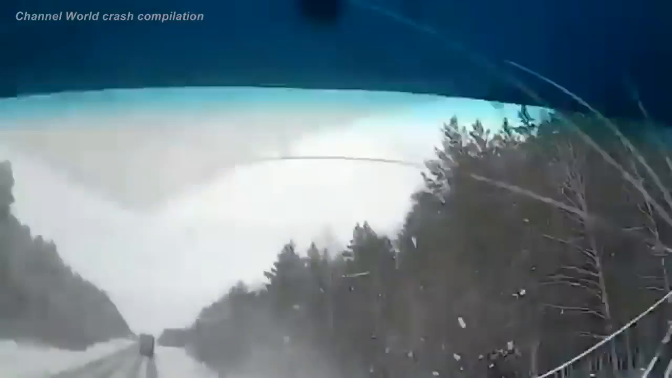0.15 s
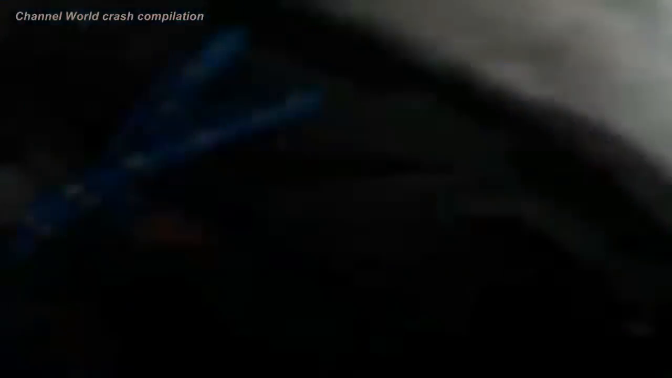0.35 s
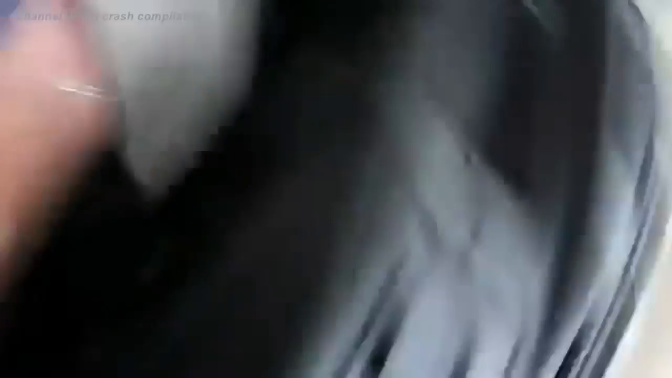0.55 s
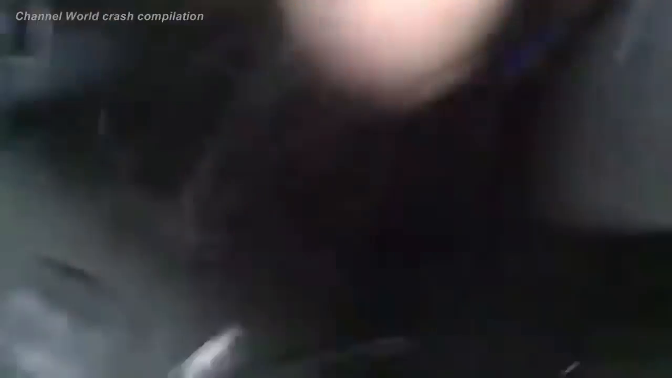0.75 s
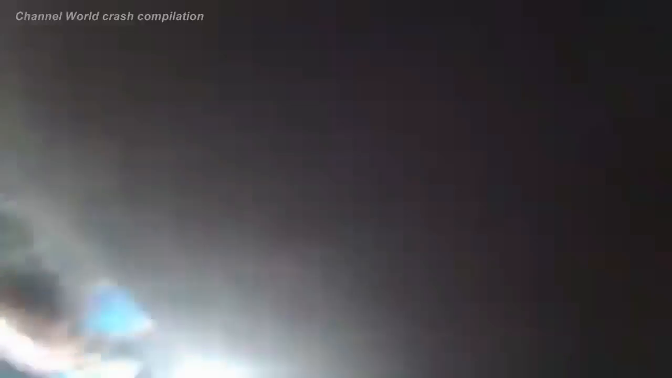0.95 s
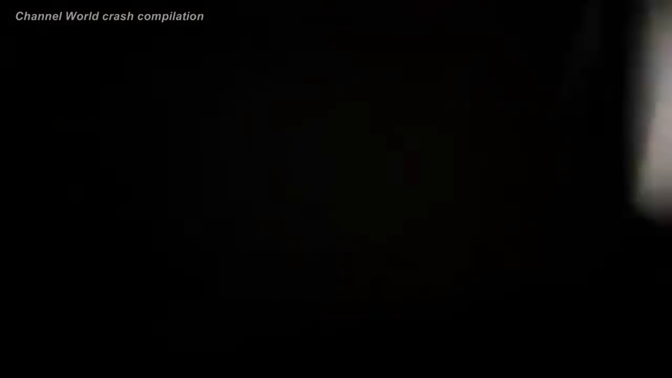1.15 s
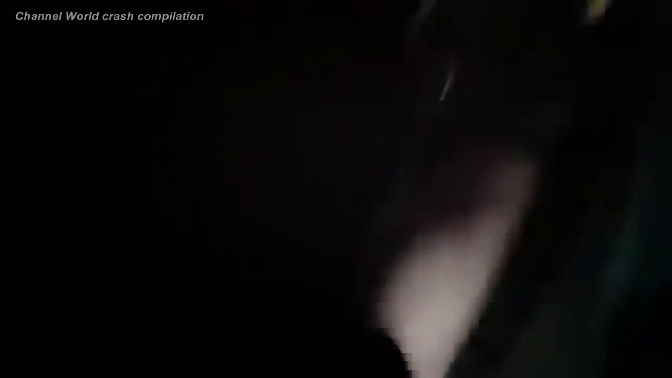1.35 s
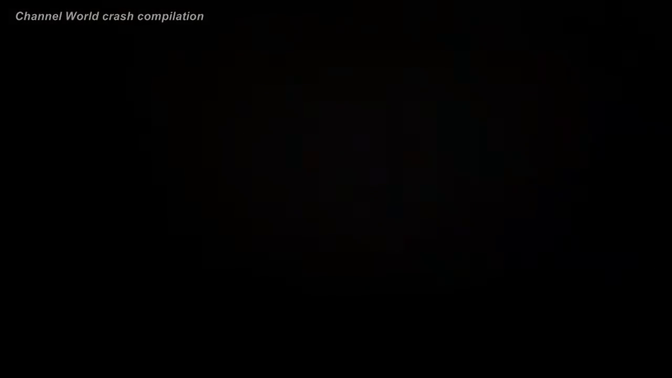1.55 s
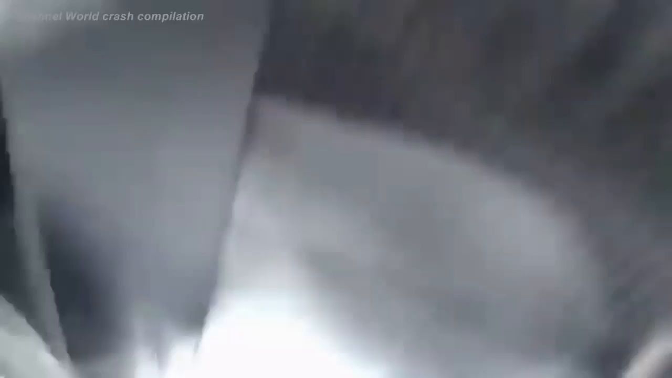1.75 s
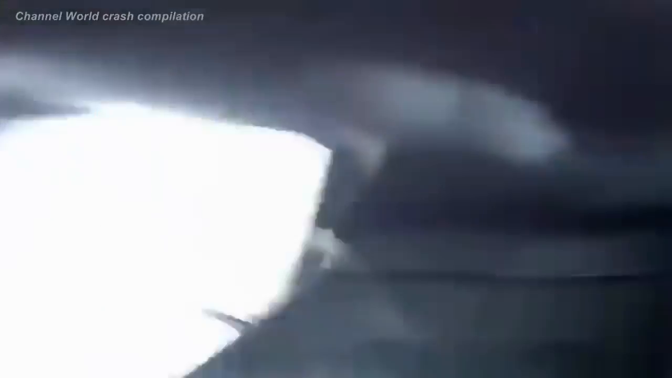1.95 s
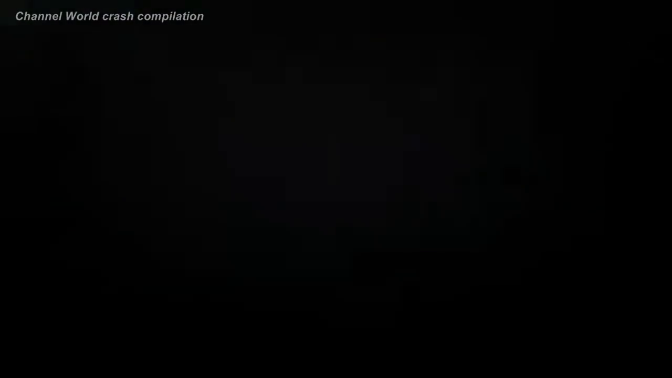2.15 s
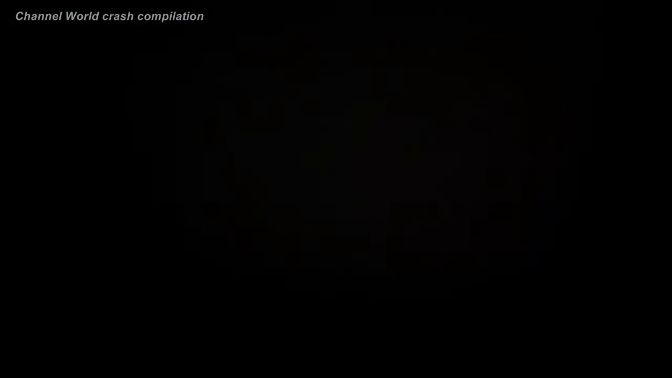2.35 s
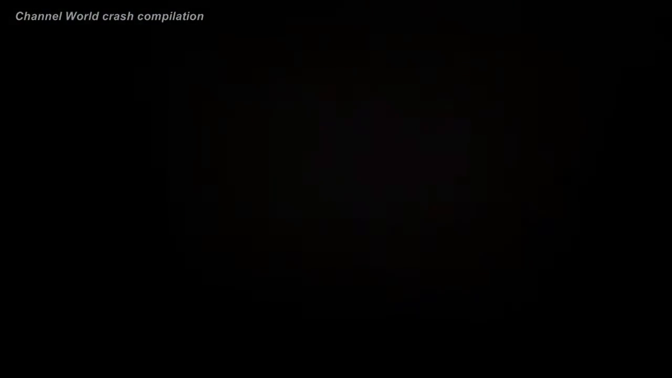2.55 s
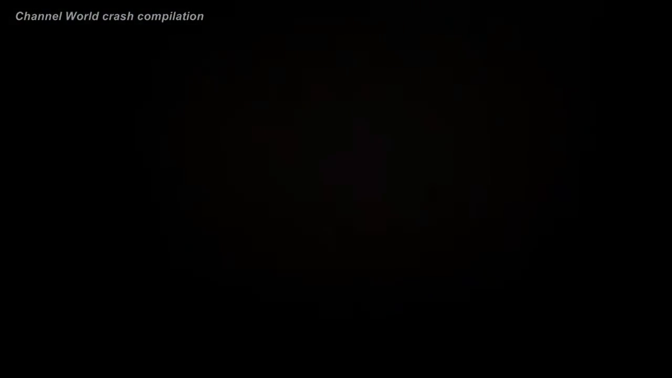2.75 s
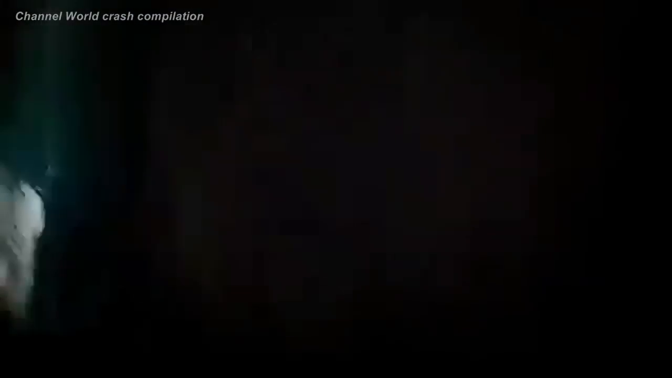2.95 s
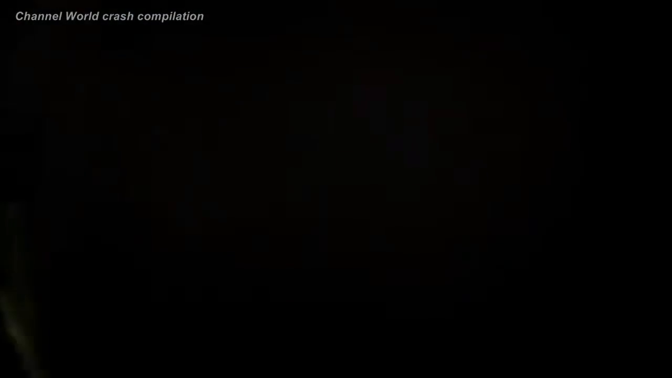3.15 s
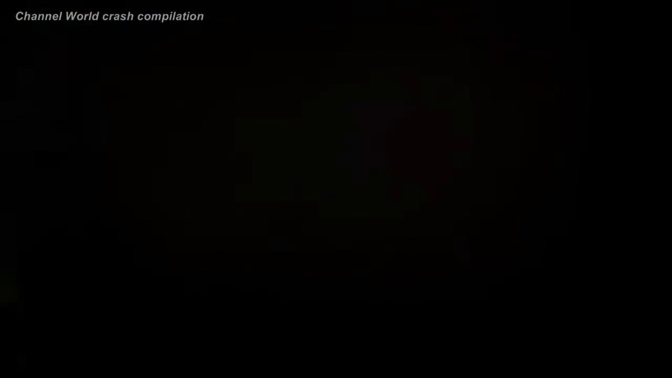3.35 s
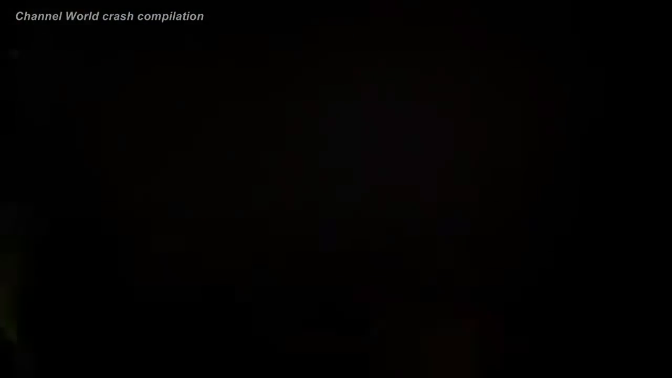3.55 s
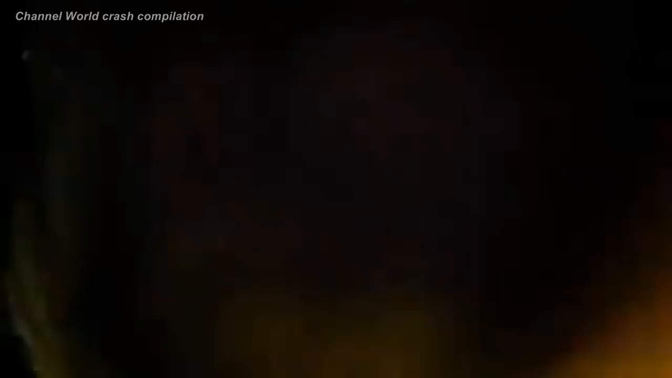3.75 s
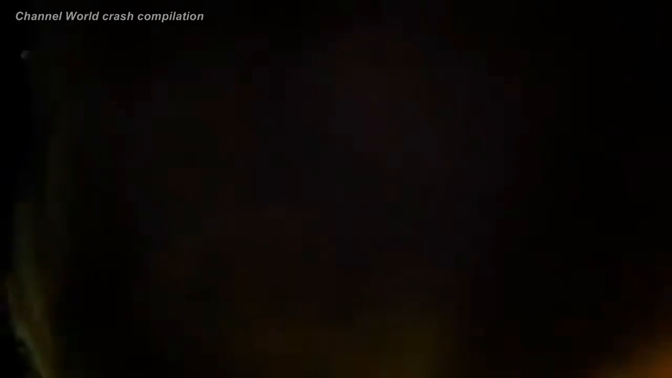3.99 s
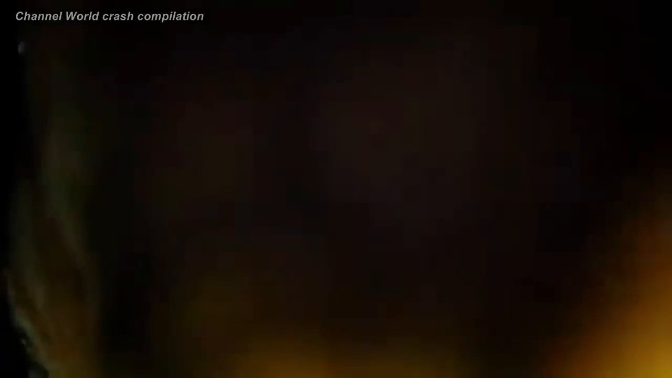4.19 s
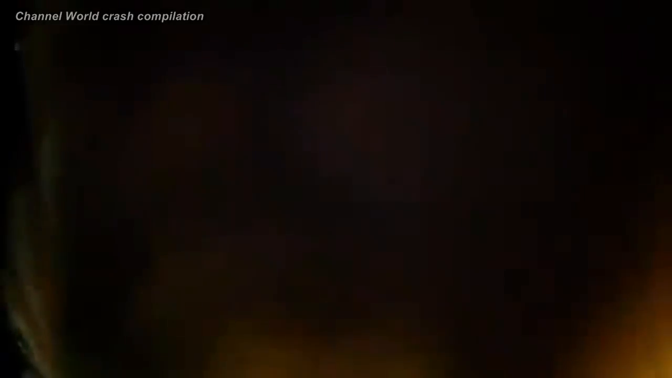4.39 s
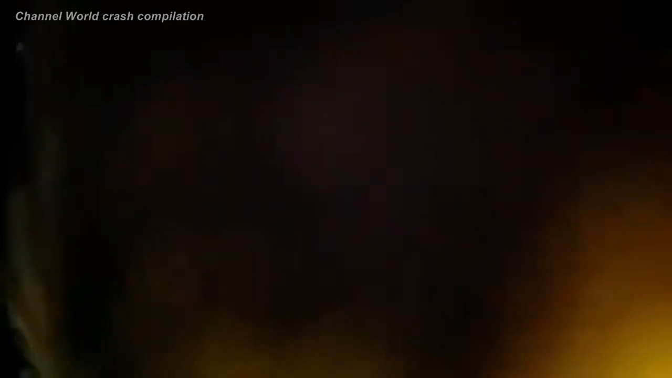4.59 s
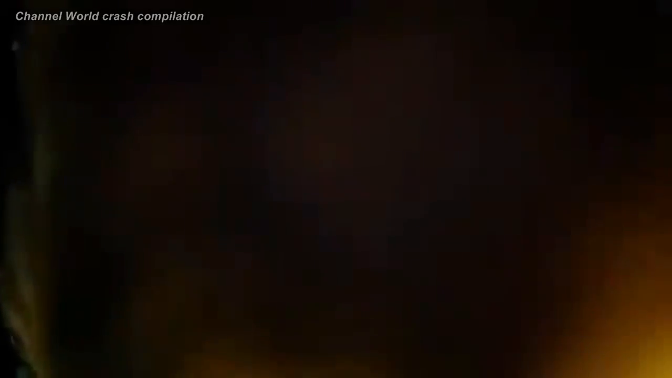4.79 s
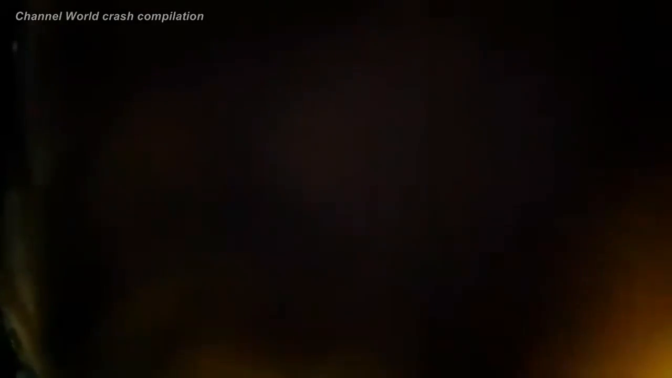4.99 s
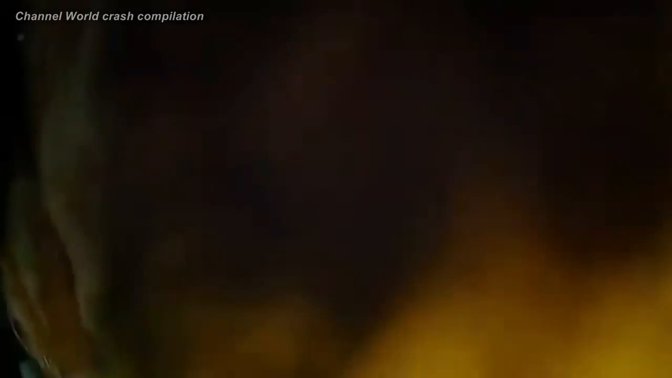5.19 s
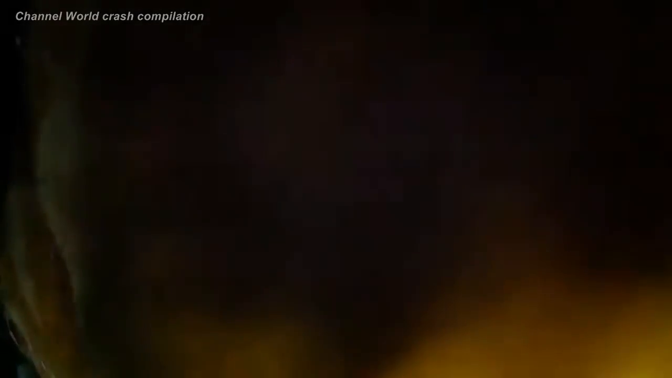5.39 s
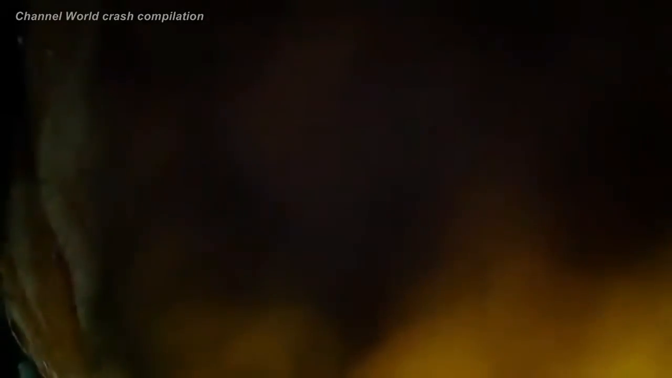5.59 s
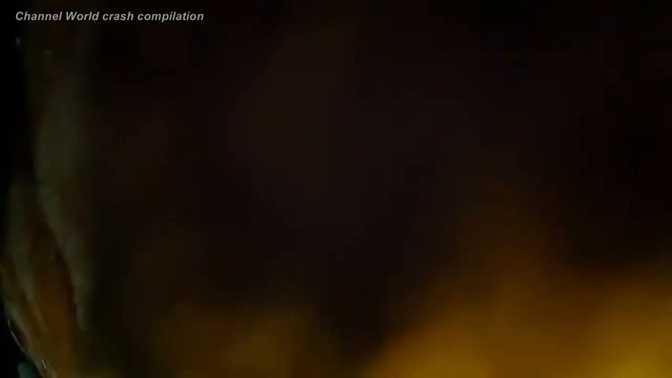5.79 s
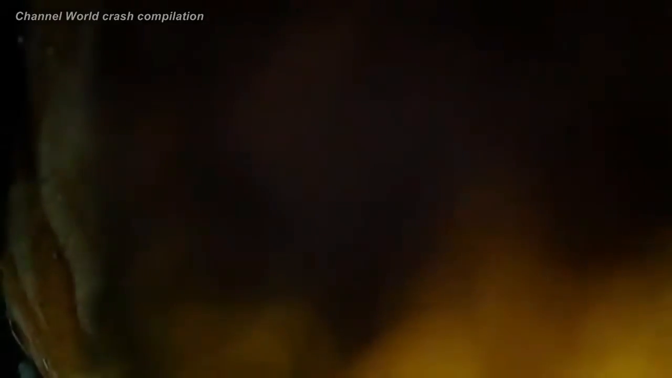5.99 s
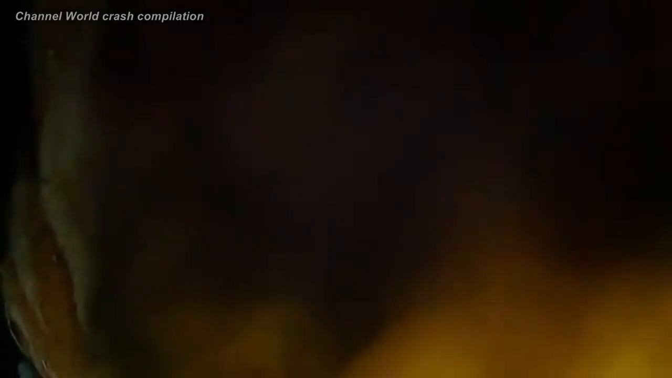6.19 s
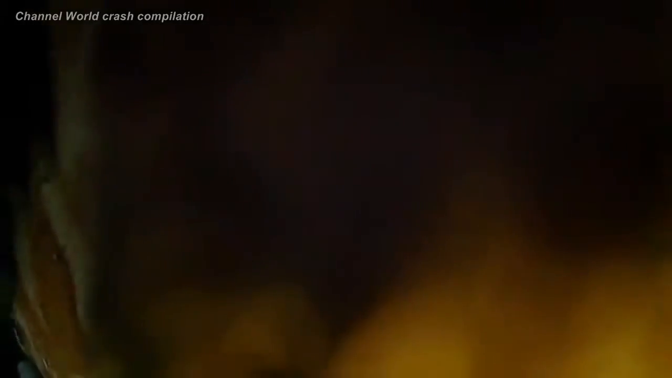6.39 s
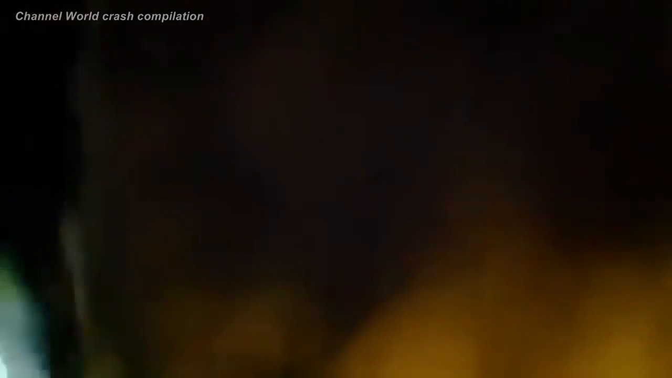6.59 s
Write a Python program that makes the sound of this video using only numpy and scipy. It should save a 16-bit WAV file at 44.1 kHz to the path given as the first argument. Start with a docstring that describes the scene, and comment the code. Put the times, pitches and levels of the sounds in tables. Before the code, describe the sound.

Overloaded crunching of crumpling metal, sharp knocks and scraping fragments in a vehicle cab, surging twice, then fading to faint rattles over quiet hiss.

```python
"""Lorry crash and rollover

Heard in the cab: sheet metal crumples, the body booms and hard things strike near the microphone;
then loose parts slide, knock and clink while everything settles.
Crumpling and booming are filtered noise with wandering levels, fragments and glass are damped sines,
and contacts are noise bursts that excite damped modes. The microphone stage overloads on the loudest."""
import sys
import numpy as np
from scipy import signal
from scipy.fft import rfft, irfft, next_fast_len
from scipy.io import wavfile
from scipy.ndimage import uniform_filter1d, map_coordinates

SR = 44100
rng = np.random.default_rng(int(sys.argv[2]) if len(sys.argv) > 2 else 0)


def to_wav(s):
    """Save 16-bit WAV."""
    ch = np.atleast_2d(s).T  # columns
    pcm = np.round(np.clip(ch, -1, 1) * 32767)  # PCM
    wavfile.write(sys.argv[1], SR, pcm.astype(np.int16))


N = 292812

# Slow course of the crumpling and sliding debris: (time [s], level [dB])
WRECK_COURSE = [(0.0, 0), (0.21, 1.5), (0.38, -8), (0.7, -21), (0.8, -19), (0.92, -29), (1.12, -36),
                (1.24, -30), (1.49, -33), (1.6, -8), (1.93, -13), (2.16, -6), (2.36, -19), (2.5, -12),
                (2.73, -33), (2.8, -25), (3.16, -38), (3.5, -37), (3.92, -54), (4.17, -51), (4.63, -44),
                (5.2, -50), (5.82, -64), (6.3, -63), (6.63, -55.5)]
# Noise spectrum of crunching and scraping: (frequency [Hz], relative power density [dB])
GRIT_SPECTRUM = [(300, -29.5), (700, -4.5), (1200, -1), (2000, -4), (3000, -3.5), (4000, -10), (6000, -23),
                 (10500, -21.5), (13000, -39)]
# Sudden hits near the microphone: (time [s], strength [dB], ring frequency [Hz], contact duration [s])
HITS = [(0.426, -6, 1850, 0.022), (0.488, 3.5, 1950, 0.025), (0.552, 3, 2834, 0.026),
        (0.628, -16, 2200, 0.003), (0.733, 0, 1960, 0.0063), (0.746, -1, 1394, 0.0017),
        (0.788, -4, 2500, 0.005), (0.931, -1.5, 2290, 0.0035), (0.972, 3.5, 1960, 0.014),
        (1.008, -5.5, 1900, 0.0046), (1.054, -13.5, 1000, 0.0024), (1.182, -23, 3397, 0.004),
        (1.255, 3, 2930, 0.0095), (1.283, 1, 3330, 0.018), (1.307, -1, 1200, 0.005),
        (1.331, -1, 1069, 0.008), (1.345, -1, 1097, 0.0024), (1.356, 2.5, 1106, 0.0039),
        (1.379, -6, 1130, 0.0023), (1.418, -9, 1680, 0.0027), (1.468, -3.5, 1810, 0.002),
        (1.477, -6, 1930, 0.0023), (1.649, 1.5, 2178, 0.026), (1.727, -4, 2062, 0.0039),
        (2.066, -2, 2100, 0.006), (2.182, 0.5, 1660, 0.027), (2.297, -5.5, 1093, 0.007),
        (2.312, -5.5, 2240, 0.003), (2.371, -9, 2987, 0.003), (2.504, 0.5, 2230, 0.03),
        (2.55, -1.5, 2340, 0.0057), (2.588, -15, 2480, 0.0064), (2.627, 0.5, 2370, 0.0047),
        (2.652, -8.5, 2996, 0.0022), (2.66, -9.5, 2118, 0.017), (2.688, -6, 3125, 0.002),
        (2.701, -14, 2146, 0.001), (2.772, -15, 1070, 0.003), (2.809, -13, 2250, 0.003),
        (2.818, -0.5, 2250, 0.012), (2.841, -6.5, 2370, 0.0036), (2.853, -11.5, 1582, 0.001),
        (2.864, -12.5, 2470, 0.002), (2.899, 3, 1990, 0.0058), (2.918, -9.5, 2390, 0.001),
        (2.955, -6, 1177, 0.003), (3.04, -12.5, 2180, 0.003), (3.143, -32, 3380, 0.0023),
        (3.286, -22.5, 3240, 0.002), (3.395, -27.5, 900, 0.007), (3.642, -27, 3320, 0.003),
        (3.723, -29, 2280, 0.009), (3.747, -34.5, 2610, 0.0055), (4.183, -29.5, 3000, 0.002),
        (4.211, -33, 2070, 0.008), (4.285, -33, 3560, 0.014), (4.49, -27.5, 3000, 0.003),
        (4.531, -24, 1550, 0.002), (4.57, -36, 3000, 0.002), (4.638, -20.5, 1220, 0.0017),
        (4.68, -36, 2270, 0.008), (4.758, -30.5, 2680, 0.014), (4.775, -37.5, 2600, 0.045),
        (4.877, -19.5, 1070, 0.0035), (4.95, -29, 1290, 0.002), (4.976, -36.5, 1090, 0.002),
        (5.046, -41, 810, 0.0055), (5.14, -33.5, 2300, 0.0066), (5.15, -21.5, 2400, 0.0022),
        (5.206, -26.5, 1440, 0.015), (5.222, -38.5, 2520, 0.022), (5.252, -35, 950, 0.013),
        (5.688, -33, 1620, 0.001), (6.007, -46.5, 812, 0.008), (6.095, -37.5, 3300, 0.002),
        (6.147, -49, 2400, 0.008), (6.512, -45.5, 817, 0.01)]
# Scrapes and crunches that swell before they bite:
# (time [s], strength [dB], ring frequency [Hz], swell duration [s], contact duration [s])
SCRAPES = [(0.38, 2, 2495, 0.02, 0.013), (0.634, -13, 1527, 0.008, 0.004), (0.795, -12, 2616, 0.008, 0.027),
           (0.955, -19, 2200, 0.014, 0.003), (1.14, -18.5, 1985, 0.0084, 0.0074),
           (1.228, -22, 2600, 0.01, 0.015), (1.316, -12, 2400, 0.005, 0.004),
           (1.39, -1, 3070, 0.011, 0.0097), (1.538, 0, 480, 0.025, 0.025), (1.596, 5.5, 2890, 0.01, 0.028),
           (1.731, -3.5, 1274, 0.051, 0.0038), (1.842, -6.5, 1572, 0.027, 0.0088),
           (1.9, -9, 1500, 0.03, 0.03), (1.95, -6, 1082, 0.036, 0.041), (2.048, -2, 2028, 0.014, 0.0085),
           (2.071, -2, 853, 0.049, 0.026), (2.158, 2.5, 2303, 0.005, 0.014), (2.212, 1, 2285, 0.014, 0.028),
           (2.324, -8.5, 1128, 0.0042, 0.018), (2.38, -9, 1160, 0.0089, 0.0079),
           (2.431, -2, 2280, 0.046, 0.017), (2.733, -23.5, 1607, 0.013, 0.01),
           (2.929, -8, 2337, 0.01, 0.002), (3.085, -30, 3000, 0.01, 0.03),
           (3.179, -27.5, 3100, 0.028, 0.005), (3.352, -32, 1010, 0.022, 0.0043),
           (3.443, -36, 840, 0.024, 0.0051), (3.48, -33, 3100, 0.029, 0.019),
           (3.681, -33, 2260, 0.013, 0.024), (3.966, -49, 810, 0.034, 0.023),
           (4.228, -28.5, 3400, 0.011, 0.012), (4.308, -28.5, 1430, 0.011, 0.006),
           (4.37, -39.5, 990, 0.013, 0.002), (4.717, -31.5, 810, 0.031, 0.003),
           (4.999, -37, 830, 0.0057, 0.009), (5.02, -33, 1000, 0.006, 0.0043),
           (5.339, -46, 2290, 0.011, 0.037), (5.621, -49, 816, 0.039, 0.006),
           (5.705, -47, 2400, 0.004, 0.012), (6.031, -48.5, 814, 0.016, 0.008),
           (6.41, -53, 2600, 0.02, 0.02), (6.452, -47, 2910, 0.017, 0.025),
           (6.575, -49.5, 810, 0.018, 0.007)]
HIT_RISE_S = .001
# All contacts in order of time, with the columns of SCRAPES
CONTACTS = sorted([(s, db, hz, HIT_RISE_S, contact) for s, db, hz, contact in HITS] + SCRAPES)


def amp(db):
    """Amplitude ratio of a level in decibels."""
    return 10 ** (np.asarray(db) / 20)


def unit(x):
    """Normalization to a root-mean-square value of one."""
    return x / np.sqrt(np.mean(x ** 2) + 1e-20)


def curves(rows):
    """Linear interpolation: one value per sample for each column after the time."""
    s, *columns = np.transpose(rows)
    return [np.interp(np.arange(N) / SR, s, column) for column in columns]


def wobble(rate):
    """Band-limited fluctuation: a spline through random knots, rate of them a second."""
    knots = rng.standard_normal(int(N * rate / SR) + 4)
    return map_coordinates(knots, [np.arange(N) * rate / SR])


def coloured(x, points):
    """Minimum-phase filtering by (Hz, dB) points, with power gain 1 for white noise."""
    f, db = np.transpose(points)
    hz = np.fft.rfftfreq(4096, 1 / SR)
    gain = unit(amp(np.interp(np.log(hz + 1), np.log(f + 1), db)))
    # folding the cepstrum onto positive times makes the filter causal
    cepstrum = irfft(np.log(gain + 1e-6))
    cepstrum[1:2048] *= 2
    cepstrum[2049:] = 0
    response = irfft(np.exp(rfft(cepstrum)))
    return signal.fftconvolve(x, response)[:len(x)]


def patchy(depth_db, bins, frames):
    """Random modulation in time and frequency: noise whose loudness varies in patches."""
    z = signal.stft(rng.standard_normal(N), nperseg=256)[2]
    field = uniform_filter1d(rng.standard_normal(z.shape), size=bins, axis=0)
    field = uniform_filter1d(field, size=frames, axis=1)
    return unit(signal.istft(z * amp(depth_db * unit(field)), nperseg=256)[1][:N])


def dying(rows, rise_s):
    """Exponential decay: summed power of events (time [s], level [dB], t60 [s]) after a short rise."""
    power = np.zeros(N + SR)
    t = np.arange(SR) / SR
    for s, db, t60 in rows:
        envelope = amp(db - 60 * t / t60) * np.minimum(1, t / rise_s)
        power[round(s * SR):][:SR] += envelope ** 2
    return power[:N]


def hiss():
    """Stationary random noise: the quiet cab and the electronics beneath every other sound."""
    # Background spectrum: (frequency [Hz], relative power density [dB])
    hiss_spectrum = [(25, -27), (170, -1.5), (260, -8), (1270, -15), (4330, -33), (10500, -30.5),
                     (12500, -59.5)]
    return amp(-59) * coloured(rng.standard_normal(N), hiss_spectrum)


def boom():
    """Low-frequency structural resonance: shell and loose panel boom, and the chassis rumbles."""
    # Spectra of shell, loose panel and chassis: (frequency [Hz], relative power density [dB])
    shell_spectrum = [(60, -29), (150, -7), (320, -0.5), (500, -1.5), (800, -8), (1500, -26), (3000, -51.5)]
    panel_spectrum = [(60, -30), (120, -6), (180, 0), (240, -3), (400, -25), (1200, -70), (4000, -120)]
    chassis_spectrum = [(15, -28.5), (40, -11), (90, 0.5), (140, -6), (300, -40.5)]
    # Heavy knocks on the shell: (time [s], level [dB], decay time t60 [s])
    thuds = [(0.0, -13, 1.5), (0.4, -17, 1.2), (0.72, -19, .4), (0.97, -22, .6), (1.25, -23, .7),
             (1.495, -7, .6), (1.54, -5, .5), (1.585, -7, .8), (1.66, -10, 1), (1.74, -10, 2.2),
             (2.64, -26, .6), (2.91, -25, 1), (3.04, -24, .6), (3.38, -27, .3), (3.435, -25, .6),
             (3.645, -33, .3), (3.76, -39, .5), (3.82, -29.5, .25), (3.96, -36, .7), (4.07, -37, .35),
             (4.26, -38, 2), (4.575, -32, .6), (4.72, -37, .8), (5.0, -36, .8), (5.45, -50, 1),
             (6.06, -56, .8), (6.25, -56, 2), (6.4, -57, 3)]
    # Deep rumble of the chassis: (time [s], level [dB])
    chassis_course = [(0.0, -19.5), (0.09, -27), (1.2, -46), (1.64, -23), (2.75, -48), (2.9, -34),
                      (3.23, -48), (4.3, -58), (5.05, -53), (5.97, -61), (6.4, -51), (6.64, -51)]

    shell = coloured(patchy(depth_db=2.5, bins=1, frames=5) * amp(2.2 * wobble(35)), shell_spectrum)
    panel = coloured(rng.standard_normal(N) * amp(3 * wobble(14)), panel_spectrum)
    chassis = coloured(rng.standard_normal(N) * amp(2.2 * wobble(6.9)), chassis_spectrum)

    # the shell drones along with the debris, and the powers of the thuds add to it
    drone_db = .72 * curves(WRECK_COURSE)[0] - 14.5
    shell_db = 10 * np.log10(amp(drone_db) ** 2 + dying(thuds, rise_s=.015))
    # a slope below 1 lets the panel stand out more when the shell is quiet
    panel_db = .78 * shell_db - 14.5
    chassis_db = curves(chassis_course)[0]
    return amp(shell_db) * unit(shell) + amp(panel_db) * unit(panel) + amp(chassis_db) * unit(chassis)


def clinks():
    """Free vibration of a single mode: each small piece of glass rings at one decaying tone."""
    # Glass pieces: (time [s], frequency [Hz], level [dB], decay time t60 [s])
    glass = [(5.345, 2290, -43, 0.11), (5.398, 4107, -42.5, 0.2), (5.4, 2320, -50, .07),
             (5.47, 3640, -51.5, .1)]
    out, t = np.zeros(N + SR), np.arange(SR // 3) / SR
    for s, hz, db, t60 in glass:
        envelope = amp(db - 60 * t / t60) * np.minimum(1, t / 0.0039)
        out[round(s * SR):][:len(t)] += envelope * np.sin(2 * np.pi * hz * t)
    return out[:N]


def squeal():
    """Irregular frictional vibration: a dragged metal edge sings with unsteady pitch and level."""
    # Dragging metal: (time [s], mean frequency [Hz], mean level [dB])
    drag = [(2.43, 2300, -40), (2.455, 2350, -8), (2.49, 2300, -1), (2.52, 2220, -3.5), (2.56, 2320, -15.5),
            (2.575, 2300, -40)]
    hz, db = curves(drag)
    db = np.where(db > -40, db, -120)  # silent outside the drag
    rough_hz = hz + 130 * wobble(250)
    return amp(db + 4 * wobble(180)) * np.sin(2 * np.pi * np.cumsum(rough_hz) / SR)


def grains(count, centre_hz, cycles, spread_db):
    """Superposed free vibrations: small fragments, each a short damped ring at its own pitch."""
    when, pitch = rng.random(count), rng.standard_normal(count)
    size = np.minimum(rng.exponential(size=count), 3)
    hz = np.clip(centre_hz * np.exp(.4 * pitch), 600, 4200)[:, None]
    step = np.arange(SR // 150)
    decay = np.exp(-step / SR * hz / cycles)  # falls to 1/e in this many cycles
    rings = amp(spread_db * size)[:, None] * decay * np.sin(2 * np.pi * hz * step / SR)
    at = (when * N).astype(int)[:, None] + step
    return unit(np.bincount(at.ravel(), rings.ravel(), minlength=N)[:N])


def debris_db():
    """Addition of incoherent powers: the course of the wreck plus what each contact shakes loose."""
    shake_db, shake_t60 = -21, .45  # dB relative to the contact's strength, s
    loosened = [(s + rise + contact, db + shake_db, shake_t60) for s, db, hz, rise, contact in CONTACTS]
    shaken = dying(loosened, rise_s=.015)
    return 10 * np.log10(amp(curves(WRECK_COURSE)[0]) ** 2 + shaken)


def crunch():
    """Dense random micro-impacts: crumpling metal and grit as a patchy rush full of ringing fragments."""
    rush = coloured(patchy(depth_db=2.0, bins=4, frames=4) * amp(1.8 * wobble(60)), GRIT_SPECTRUM)
    bits = grains(count=3500, centre_hz=2300, cycles=2.5, spread_db=4)
    return amp(debris_db()) * unit(unit(rush) + amp(-3) * bits)


def contact_burst(t, rise, contact, t60, tail_db, tail_t60):
    """Contact excitation: noise swells, chatters while the pieces touch, then dies; the cab answers."""
    after = np.maximum(t - rise - contact, 0)
    swell = amp(-15 * np.maximum(1 - t / rise, 0))
    decay = amp(-60 * after / t60) + amp(tail_db - 60 * after / tail_t60)  # own decay + cab's answer
    knots = t[::70]
    chatter = amp(3.8 * np.interp(t, knots, rng.standard_normal(len(knots))))
    # a sudden contact starts with its hardest touch
    first = 1 + 1.6 * amp(-60 * np.abs(t - rise) / 0.012) * (rise < .002)
    return swell * decay * chatter * first * rng.standard_normal(len(t))


def struck_body(t, db, hz, duration, ring_db, trim_db, width_hz):
    """Modal superposition: impulse response of the struck piece and the cab trim."""
    # Cab plastics: (frequency [Hz], bandwidth [Hz], relative level [dB])
    trim = [(1100, 270, -1), (1918, 98, -9), (2365, 190, -8), (3278, 220, -4.5), (4190, 120, -10.5),
            (4810, 140, -22), (6940, 150, -28.5)]
    trim_per_db = -.25  # gentle contacts give the trim a larger part: dB per dB of strength
    free_db = -10 * np.log10(1 + duration / 0.013)  # a long contact damps the ringing
    # width_hz is the bandwidth of a piece that rings at 2 kHz
    modes = [(hz, width_hz * hz / 2000, ring_db - 1.5 * np.log2(hz / 1500))]
    for centre, width, level in trim:
        modes.append((centre, width, level + trim_db + trim_per_db * db + rng.normal(0, 3.75)))
    body = np.zeros(len(t))
    for centre, width, level in modes:
        ring = np.exp(-np.pi * width * t) * np.sin(2 * np.pi * centre * t)
        body += amp(level + free_db) * np.sqrt(width) * ring
    return body


def impacts(rows, gain_db, ring_db, trim_db, width_hz, t60, tail_db, tail_t60):
    """Source-filter principle: each contact is heard directly and through the modes it excites."""
    # Noise spectrum of a hard impact: (frequency [Hz], relative power density [dB])
    crack_spectrum = [(100, -22), (300, -12), (600, -7.5), (1500, -3), (3200, 0.5), (4500, -9.5),
                      (7000, -18.5), (11000, -21.5), (13000, -35.5)]
    bright_per_db = .12  # harder contacts are brighter above 5 kHz: dB per dB of strength
    out, t = np.zeros(N + SR), np.arange(SR // 4) / SR
    for s, db, hz, rise, contact in rows:
        burst = contact_burst(t, rise, contact, t60, tail_db, tail_t60)
        body = struck_body(t, db, hz, rise + contact, ring_db, trim_db, width_hz)
        ringing = signal.fftconvolve(burst, body[:2000])[:len(t)]
        direct_db = -1.2 * np.log2(3000 / hz)  # big, low pieces crack less and ring more
        # slow or feeble contacts are dull scrapes
        colour = crack_spectrum if rise < .012 and db > -45 else GRIT_SPECTRUM
        colour = [(f, g + bright_per_db * (db + 18) * (f > 5000)) for f, g in colour]
        sound = coloured(amp(direct_db) * burst + ringing, colour)
        # the strength sets the level around the contact itself
        held = sound[round(.7 * rise * SR):round((rise + contact + .004) * SR)]
        out[round(s * SR):][:len(t)] += amp(db + gain_db) * sound / np.std(held)
    return out[:N]


def scene():
    """Linear superposition of all the sources at the microphone."""
    contacts = impacts(CONTACTS, gain_db=-0.4, ring_db=-43.5, trim_db=-55.5, width_hz=320,
                       t60=0.017, tail_db=-11, tail_t60=0.09)
    return (hiss() + boom() + clinks() + squeal() + crunch() + contacts)[None]


def record(dry):
    """Saturation, then linear filtering: the stage overloads and its coupling capacitor lets flat tops sag."""
    overload_level, coupling_hz, top_hz = .86, 100, 13000  # full scale = 1, Hz, Hz
    clipped = dry / (1 + np.abs(dry / overload_level) ** 8) ** (1 / 8)
    m = next_fast_len(N + SR // 2)
    hz = np.fft.rfftfreq(m, 1 / SR)
    coupling = 1j * hz / (coupling_hz + 1j * hz)
    # nothing passes above the band limit
    kept = irfft(rfft(clipped, m) * coupling * (hz < top_hz), m)[:, :N]
    return np.clip(kept, -1, 1)


dry = scene()
out = record(dry)
to_wav(out)
```